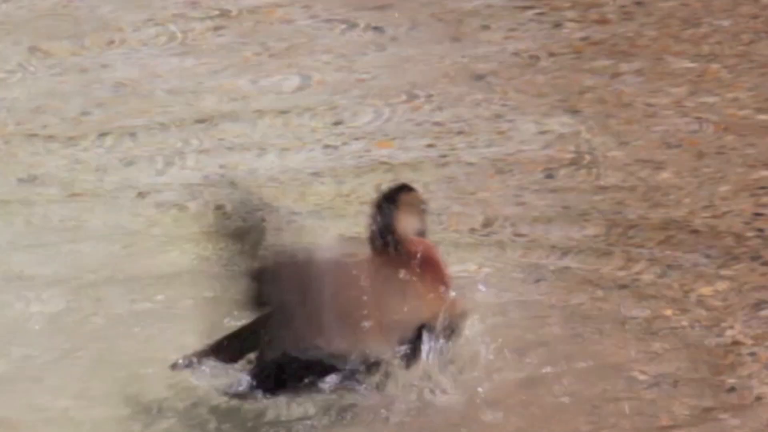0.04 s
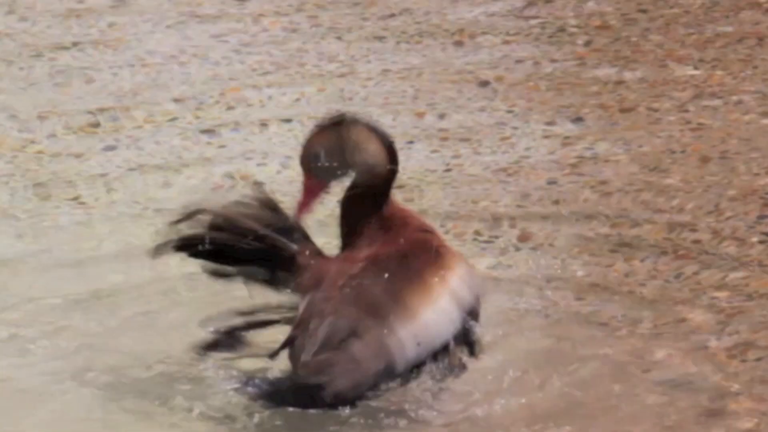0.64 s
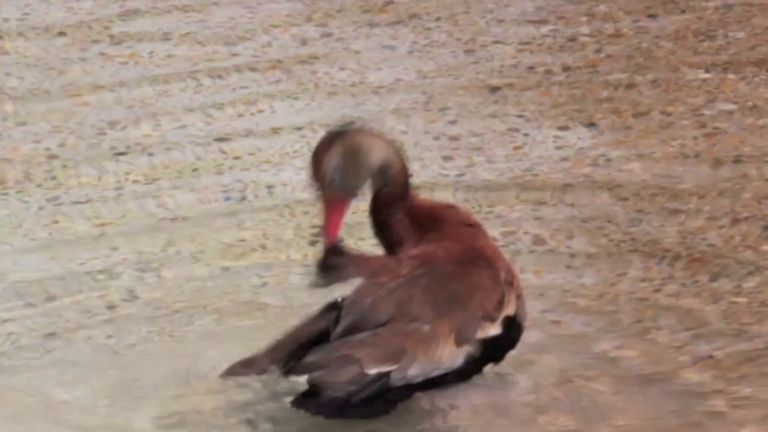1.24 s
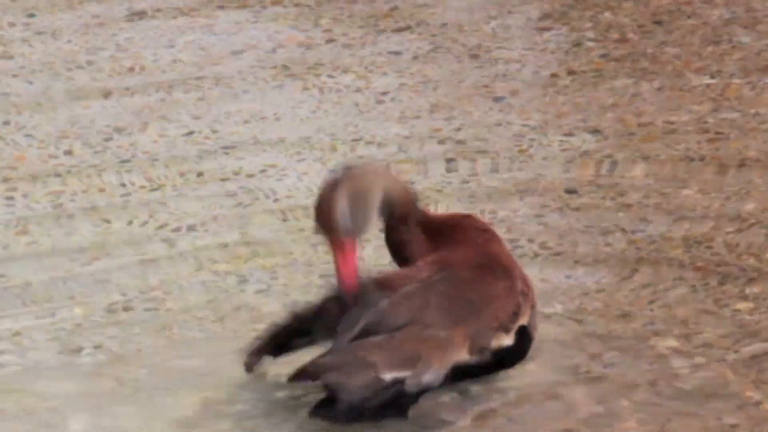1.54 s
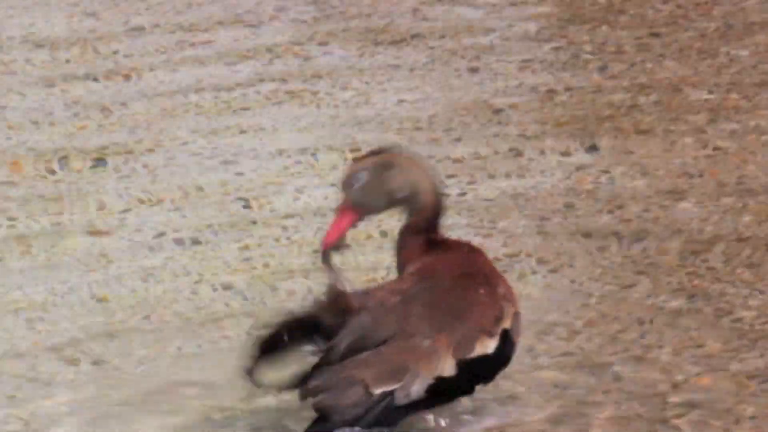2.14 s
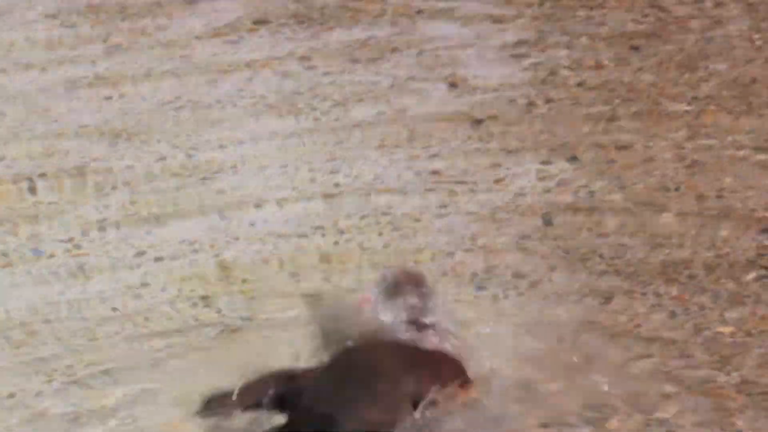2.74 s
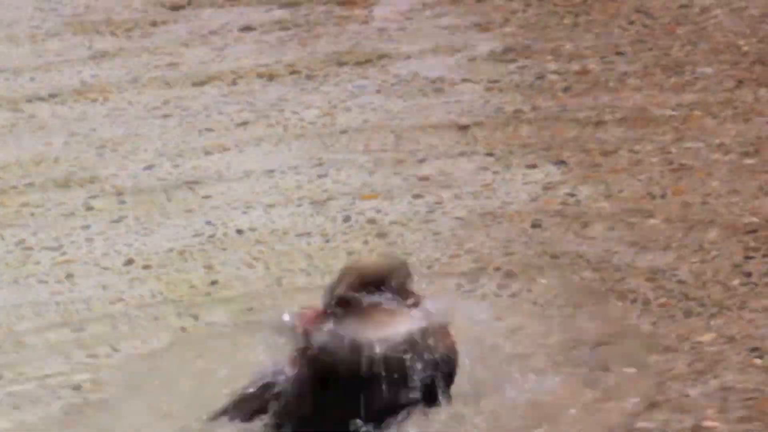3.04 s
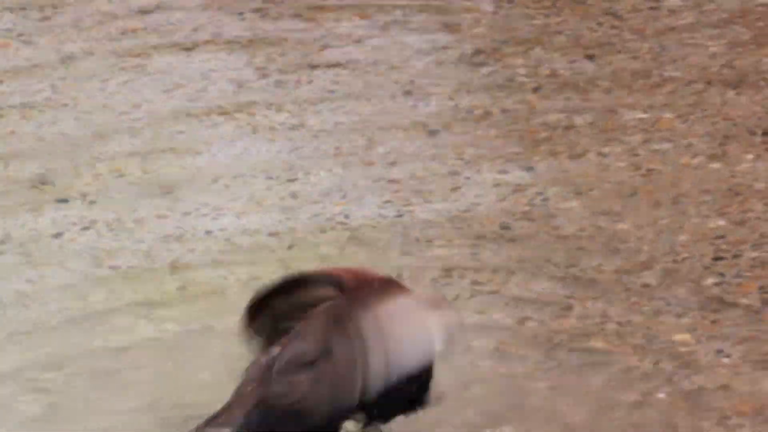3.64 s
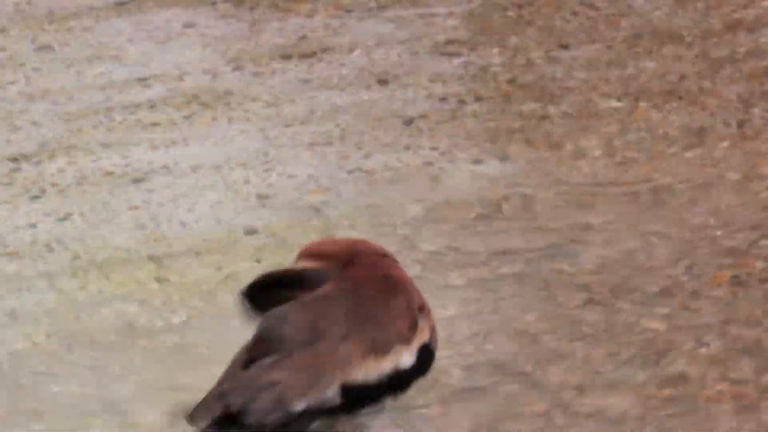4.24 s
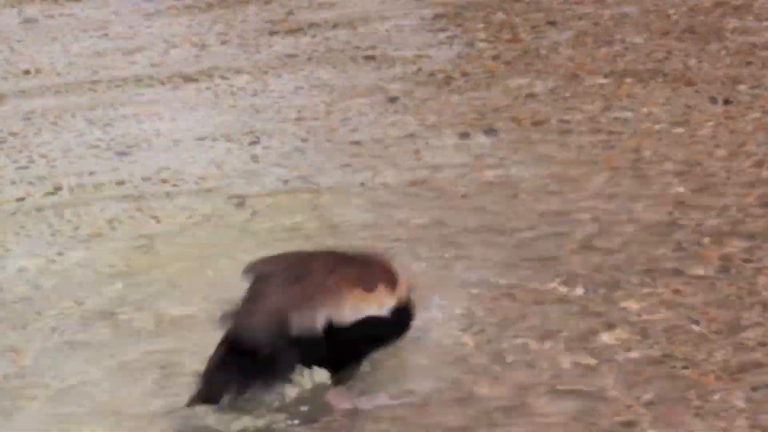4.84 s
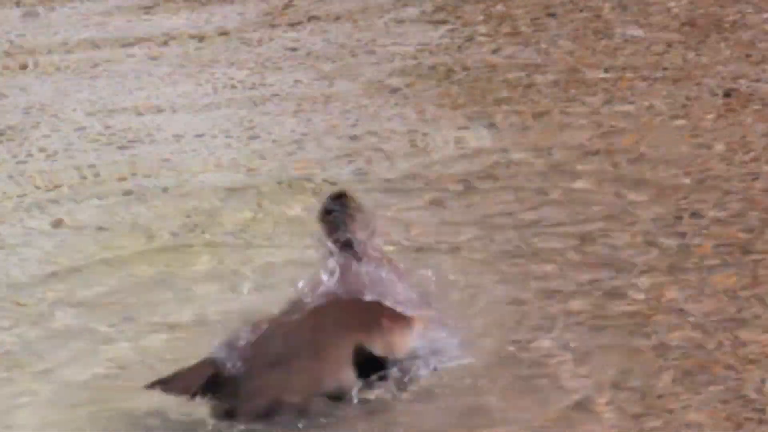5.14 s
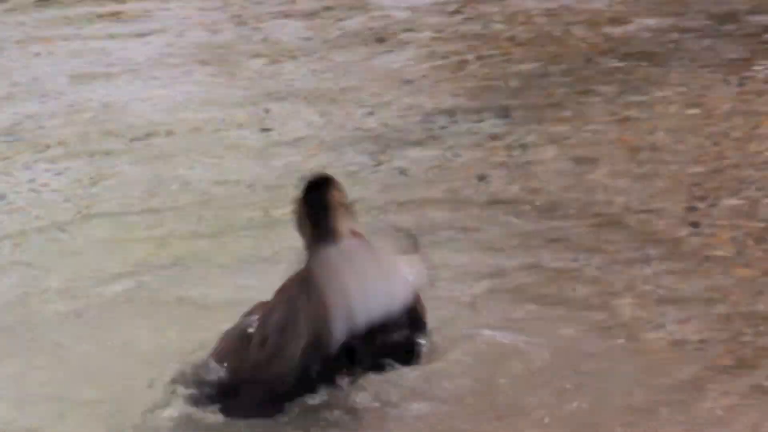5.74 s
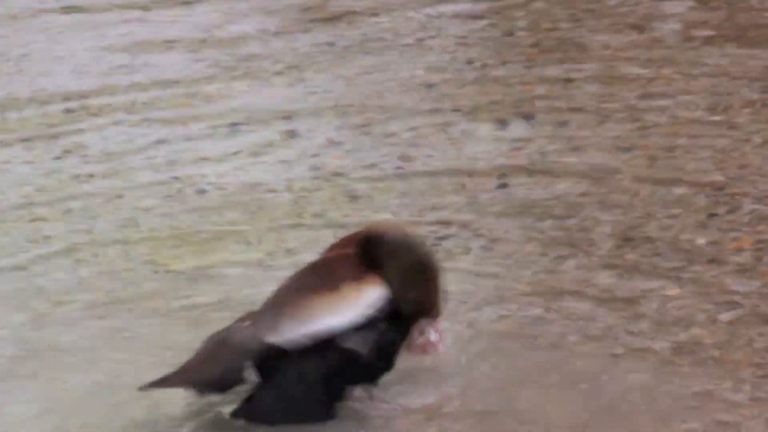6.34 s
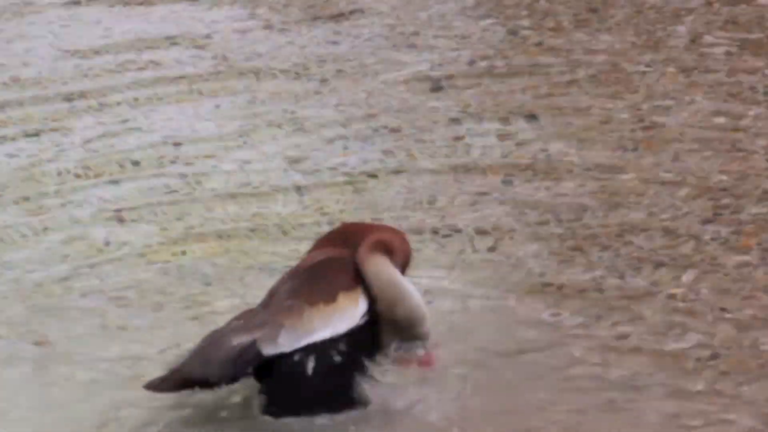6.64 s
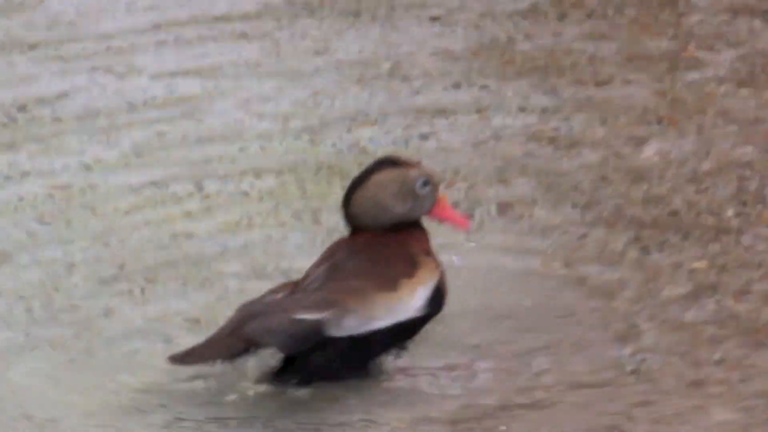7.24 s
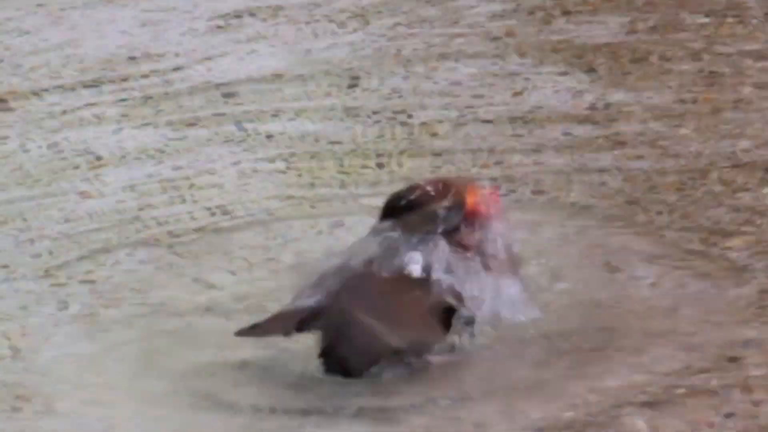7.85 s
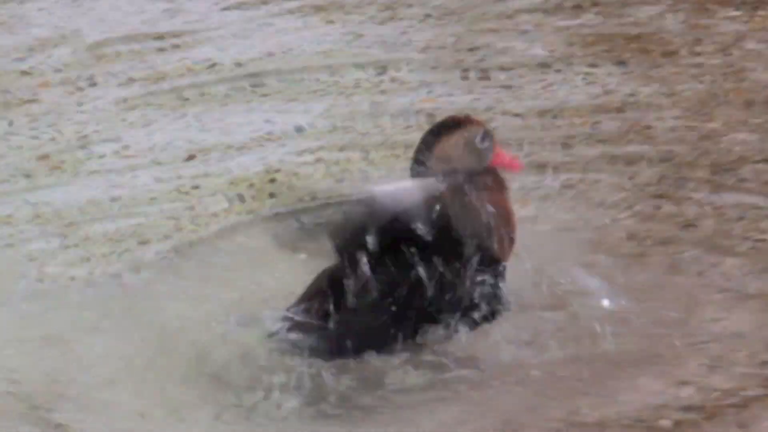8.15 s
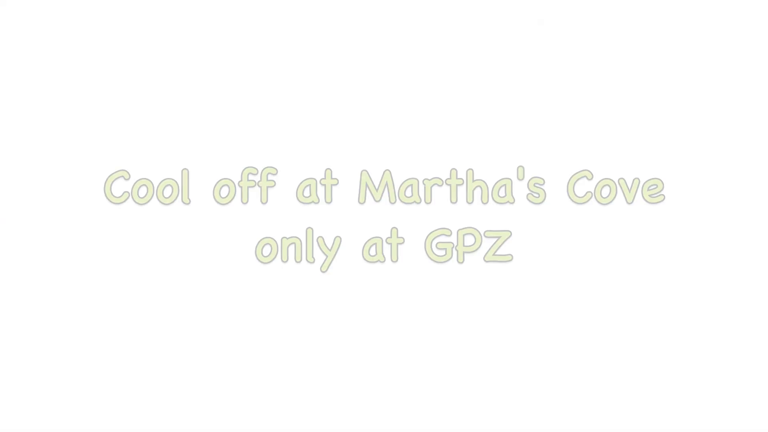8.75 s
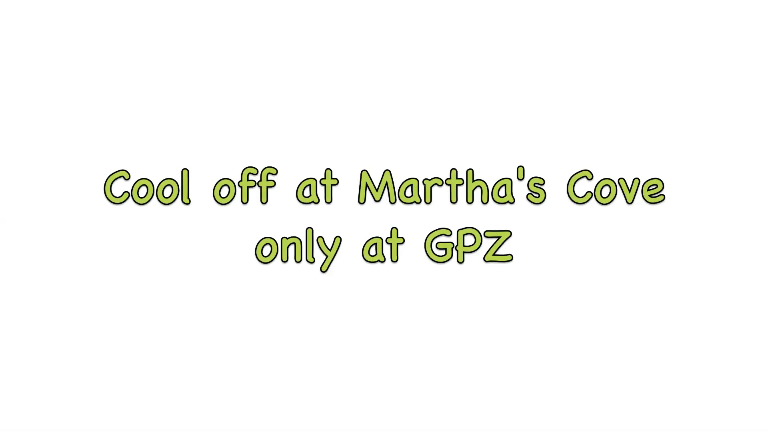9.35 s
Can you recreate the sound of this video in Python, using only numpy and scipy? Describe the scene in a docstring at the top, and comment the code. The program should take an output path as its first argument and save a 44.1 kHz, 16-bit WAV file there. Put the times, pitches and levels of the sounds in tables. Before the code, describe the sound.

Whistling ducks call, peep and splash in a shallow pond, one chattering close by, over steady water and a faint distant engine.

```python
"""Whistling ducks at a shallow pond, mono. From the start: running water, a far engine, faint hums, hiss.
Ducks whistle at once, in thin falling series that echo off the banks. Within the first second a bird
slurs upward, bathing ducks splash, something ticks and other birds peep; one pipes from 1.8 s.
At 3.2 s a duck whistles in two voices. From 4.8 s the hand softly bumps the camera. At 6 s one duck
chatters, loud and close. A last whistle series starts at 7.4 s; all fades to silence by 8.7 s."""
import sys
import numpy as np
from scipy import signal
from scipy.fft import rfft, irfft
from scipy.io import wavfile
from scipy.ndimage import map_coordinates

SR = 44100
rng = np.random.default_rng(int(sys.argv[2]) if len(sys.argv) > 2 else 0)


def wav_out(sig):
    """Save sig, one row per channel (or a flat mono array), as 16-bit PCM at SR to the path in sys.argv[1]."""
    wavfile.write(sys.argv[1], SR, np.round(np.clip(np.atleast_2d(sig).T, -1, 1) * 32767).astype(np.int16))


N = 418950
T = np.arange(N) / SR
CATCH_AT = .48  # where the voice catches, share of note length


def undb(db):
    """Decibels to gain."""
    return 10 ** (np.asarray(db) / 20)


def unit(x):
    """Scale to rms 1."""
    return x / np.sqrt(np.mean(x ** 2))


def add(out, start_s, x):
    """Mix x into out from start_s."""
    i = max(int(start_s * SR), 0)
    out[i:i + len(x)] += x[:N - i]


def band(x, hz, width_hz):
    """One resonance, gain 1 at its centre."""
    return signal.lfilter(*signal.iirpeak(min(hz, .45 * SR), hz / width_hz, SR), x)


def noise(spectrum, size=N):
    """Noise of rms 1, coloured by (freq_hz, gain_db) points."""
    hz, db = np.transpose(spectrum)
    bins_hz = np.fft.rfftfreq(size, 1 / SR) + 1
    gain = undb(np.interp(np.log(bins_hz), np.log(hz), db))
    return unit(irfft(rfft(rng.standard_normal(size)) * gain, size))


def walk(rate_hz, size=N):
    """Smooth random wander, spread near 1."""
    at = np.arange(size) / SR * rate_hz
    return map_coordinates(rng.standard_normal(int(at[-1]) + 2), [at], order=2, mode="nearest")


def turn(hz):
    """Running phase of a moving pitch."""
    return 2 * np.pi * np.cumsum(hz) / SR


def bell(t, centre_s, half_width_s):
    """Gaussian envelope, peak 1."""
    return np.exp(-((t - centre_s) / half_width_s) ** 2)


def bubbles(count, low_hz, high_hz, cycles=7, spread_db=3):
    """Small bubbles, each a short ring rising in pitch."""
    out = np.zeros(N)
    for when, pitch, size in rng.random((count, 3)):
        hz = low_hz * (high_hz / low_hz) ** pitch
        age = np.linspace(0, 1, int(2 * cycles * SR / hz))
        ring = np.sin(turn(hz * (1 + .2 * age))) * np.exp(-2 * np.pi * age)
        add(out, when * T[-1], undb(-spread_db * np.log(max(size, .01))) * ring)
    return unit(out)


def water(wash_db=-36.5, bubble_db=-46):
    """Running water: a steady wash with bubbles in it."""
    # wash spectrum: freq_hz, gain_db
    spectrum = [(15, -48.5), (25, -22), (49, -11.5), (70, -7.5), (90, -0.5), (162, -3.5), (235, -4.5),
                (293, -8), (385, -6.5), (530, -11), (748, -9), (3800, -15), (5640, -17), (7760, -26.5),
                (9000, -31.5), (11700, -52.5), (19800, -120)]
    flow_db = -.06 * walk(3)
    wash = undb(wash_db + .5 * flow_db + .5 * walk(9)) * noise(spectrum)
    return wash + undb(flow_db + bubble_db) * bubbles(count=7000, low_hz=556.6, high_hz=4330)


def engine(flicker_db=2.5):
    """A far engine changes speed; its overtones swell through two low resonances."""
    # engine run: time_s, firing_hz, fundamental_db, overtone_db
    run = [(0, 75.6, -44.5, -52), (.25, 75.2, -42, -52), (.5, 74.5, -68, -43.5), (1.0, 75.9, -44, -55.5),
           (1.27, 75.3, -48, -44.5), (1.42, 84.1, -86, -68.5), (1.58, 113.8, -44, -51.5),
           (2.15, 85.7, -53.5, -57), (2.6, 89.97, -46.5, -52), (3.2, 81, -50, -63), (4.1, 81.1, -51, -64),
           (5.0, 89, -41, -62), (5.35, 81.9, -53, -63), (6.25, 86.48, -40.5, -57), (6.5, 105, -41, -52),
           (6.74, 114, -48, -58), (6.87, 65, -43, -44.5), (7.8, 69.5, -52, -48.5),
           (8.6, 75.4, -40.5, -48.5)]
    # overtone colour: freq_hz, gain_db
    colour = [(125, 0.5), (150, 1), (172, -7.5), (202, 1.5), (222, -8.5), (400, -14.5)]
    times_s, *columns = np.transpose(run)
    firing_hz, fundamental_db, overtone_db = (np.interp(T, times_s, c) for c in columns)
    phase = turn(firing_hz * (1 + .01 * walk(25)))
    overtones = 0
    for k in range(2, 6):
        colour_db = np.interp(k * firing_hz, *np.transpose(colour))
        overtones += undb(colour_db + flicker_db * walk(9)) * np.sin(k * phase)
    fundamental = undb(fundamental_db + .93 * walk(13)) * np.sin(phase)
    return np.sqrt(2) * (fundamental + undb(overtone_db) * overtones)


def hums(edge_s=.17):
    """Two faint low hums in turn, wavering in pitch and level."""
    # hums: start_s, end_s, pitch_hz, level_db
    spans = [(-.1, 1.5, 197, -46), (1.65, 6.9, 236, -49)]
    out = np.zeros(N)
    for start_s, end_s, hz, db in spans:
        swell = np.clip(np.minimum(T - start_s, end_s - T) / edge_s, 0, 1)
        out += swell * undb(db + 2.6 * walk(15)) * np.sin(turn(hz * (1 + .02 * walk(35))))
    return out


def camera_hiss(hiss_db=-46, pulse_hz=70, pulse_depth=.59, whine_hz=15712, whine_db=-59):
    """Fine camera hiss with narrow pulsing peaks and a thin whine."""
    # hiss peaks: centre_hz, width_hz, level_db
    peaks = [(5520, 540, -53.5), (9373, 200, -59.5), (10000, 350, -54.5), (10330, 350, -52),
             (10530, 180, -52), (11650, 200, -65.5), (12087, 160, -59.5), (13100, 130, -59.5),
             (13450, 280, -65), (14300, 400, -60.5)]
    out = undb(hiss_db) * noise([(3000, -31.5), (7000, -3), (9500, 1), (12500, -.5), (15500, -4.5)])
    for hz, width_hz, db in peaks:
        pulse = 1 + pulse_depth * np.sin(2 * np.pi * (pulse_hz * T + rng.random()))
        peak = band(band(rng.standard_normal(N), hz, 1.5 * width_hz), hz, 1.5 * width_hz)
        out += undb(db) * unit(pulse * peak)
    return out + undb(whine_db + 3 * walk(3)) * np.sin(turn(whine_hz + 3 * walk(20)))


def whistle(length_s, from_hz, to_hz, arch=0, catch=0, waver=.007):
    """Phase and envelope of a gliding note; where the voice catches it dips hoarsely and weakens."""
    t = np.arange(int(length_s * SR)) / SR
    dip = catch * bell(t, CATCH_AT * length_s, half_width_s=.009)
    glide_hz = (from_hz + (to_hz - from_hz) * t / length_s) * (1 + arch * np.sin(np.pi * t / length_s))
    jitter = waver * walk(260, len(t)) + .74 * dip * walk(1500, len(t))
    phase = turn(glide_hz * (1 - dip) * (1 + jitter))
    swell = np.sin(np.pi / 2 * np.clip(np.minimum(t, length_s - t) / .016, 0, 1))  # 16 ms edges
    flutter_db = 2 * walk(110, len(t))
    catch_db = -8 * np.tanh(dip / .03)
    return phase, np.sqrt(2) * swell * undb(flutter_db + catch_db)


def ducks(third_db=1, close_db=-34, distance_share=.4, hoarse_db=15):
    """Evenly paced, nearly pure whistles that sink in pitch, with faint harmonics 2 and 3 and echoes."""
    # series, one duck each: first_s, last_s, notes, length_s, first_hz, last_hz, settle_power (1 = even),
    # fall, arch, catch, waver (these four: share of pitch, within a note),
    # first_db, middle_db, last_db, overtone_db
    series = [ (.082, 0.741, 4, .13, 4137, 3980, 3.5, .014, -0.0088, 0, 0.0041, -42.5, -34.5, -39, -61.5),
              (1.912, 2.91, 7, 0.11, 3650, 3578, 3.5, -.003, -.008, .1, 0.0074, -38.5, -40, -41.5, -63.5),
              (3.168, 3.557, 3, 0.081, 5160, 5004, .3, -0.0047, 0.009, 0.0081, 0.0067, -38.5, -36, -40.5, -68),
              (5.423, 5.888, 3, .098, 4770, 4700, 3, .014, -.015, 0.011, 0.0035, -41.5, -39.5, -43, -67.5),
              (7.404, 8.526, 6, .142, 4169, 3875, 3, 0.028, 0.0043, .026, 0.0052, -33.5, -36, -41.5, -52.5)]
    direct, scattered = np.zeros(N), np.zeros(N)
    for (first_s, last_s, notes, length_s, first_hz, last_hz, settle_power,
         fall, arch, catch, waver, *levels_db, overtone_db) in series:
        for along in np.linspace(0, 1, round(notes)):
            start_s = first_s + (last_s - first_s) * along
            hz = last_hz + (first_hz - last_hz) * (1 - along) ** settle_power
            db = np.interp(along, [0, .5, 1], levels_db)
            phase, swell = whistle(length_s, hz * (1 + fall / 2), hz * (1 - fall / 2), arch, catch, waver)
            overtones = np.sin(2 * phase) + undb(third_db) * np.sin(3 * phase)
            note = swell * (undb(db) * np.sin(phase) + undb(overtone_db) * overtones)
            note += catch * undb(db + hoarse_db) * catch_rasp(length_s, hz)
            add(direct, start_s, note)
            # fainter notes are further off: more arrives as echo
            add(scattered, start_s, note * undb(distance_share * (close_db - db)))
    return direct + banks(scattered, near_db=-3.5, far_db=-7)


def banks(x, near_db, far_db, near_t60_s=.24, far_t60_s=.85, echoes_per_s=900):
    """Quick echoes off the near banks, then a fainter tail from further off."""
    out, t = 0, np.arange(SR) / SR
    for db, t60_s, delay_s in ((near_db, near_t60_s, .008), (far_db, far_t60_s, .04)):
        echoes = rng.standard_normal(SR) * (rng.random(SR) < echoes_per_s / SR)
        echoes *= (t > delay_s) * np.exp(-np.log(1000) * t / t60_s)
        out += undb(db) * signal.fftconvolve(x, echoes / np.linalg.norm(echoes))[:N]
    return out


def slur(from_s=.32, from_hz=1195, top_hz=3030, octaves_per_s=3.25, waver=.007):
    """A bird's long rising note: the fundamental swells twice, the octave once between."""
    # partial swells: harmonic, centre_s, half_width_s, level_db
    swells = [(1, .375, .032, -42), (1, .675, .12, -42), (2, .57, .16, -48.5)]
    octaves = np.clip(octaves_per_s * (T - from_s), -1, np.log2(top_hz / from_hz))
    phase = turn(from_hz * 2 ** octaves * (1 + waver * walk(300)))
    return np.sqrt(2) * sum(undb(db) * bell(T, centre_s, half_width_s) * np.sin(round(k) * phase)
                            for k, centre_s, half_width_s, db in swells)


def splashes():
    """Bathing ducks throw up sprays of drops."""
    # sprays: start_s, length_s, centre_hz, level_db
    sprays = [(0.328, 0.14, 1500, -50), (2.045, 0.16, 1500, -43), (2.55, 0.16, 2300, -54),
              (3.99, 0.055, 1700, -44), (4.03, .055, 2500, -35.5), (7.321, 0.29, 2160, -41)]
    drops = bubbles(count=6000, low_hz=900, high_hz=5940, cycles=2.6)
    patter = banks(drops, near_db=3.5, far_db=-17)
    out = np.zeros(N)
    for start_s, length_s, hz, db in sprays:
        swell = np.sin(np.pi * np.clip((T - start_s) / length_s, 0, 1))
        out += undb(db) * swell * unit(band(patter, hz, hz / 2))
    return out


def ticks(decay_s=.003, scatter_db=.5):
    """Quick runs of dry snaps, each ringing three broad resonances."""
    # tick runs: start_s, gap_s, count, peak_db
    runs = [(.765, .026, 3, -22.5), (.894, 0.027, 3, -26.5), (1.428, .0405, 3, -24),
            (2.596, 0.027, 2, -25.5)]
    # resonances: centre_hz, width_hz, gain_db
    modes = [(1900, 350, -3), (2333, 510, 2), (4000, 1000, 0.5)]
    out, t = np.zeros(N), np.arange(SR // 20) / SR
    for start_s, gap_s, count, peak_db in runs:
        for k in range(round(count)):
            snap = rng.standard_normal(len(t)) * np.exp(-t / decay_s)
            ring = sum(undb(db) * band(band(snap, hz, width_hz), hz, width_hz)
                       for hz, width_hz, db in modes)
            gain = undb(peak_db + scatter_db * rng.standard_normal())
            add(out, start_s + k * gap_s, gain * ring / np.abs(ring).max())
    return out


def peeps(piping_s=1.846, piping_gap_s=.18):
    """Short peeps and piping around the pond, and a lower second voice under one duck's three whistles."""
    # notes: start_s, length_s, from_hz, to_hz, level_db
    # rows at 3.17, 3.391 and 3.566 s: second voice of that duck's syrinx
    short_notes = [(0.867, 0.081, 4166, 4335, -43.5), (0.933, 0.076, 4390, 4120, -40.5),
                   (1.066, .095, 3980, 3856, -38.5), (1.177, 0.051, 4620, 4400, -42.5),
                   (1.187, 0.13, 3940, 3810, -47.5), (1.478, .07, 4120, 3780, -41.5),
                   (2.07, 0.103, 1158, 1263, -44.5), (2.115, 0.046, 5240, 5050, -46),
                   (2.661, .05, 4380, 4286, -41), (3.17, .064, 4110, 3900, -45.5),
                   (3.391, 0.039, 4350, 4350, -43.5), (3.566, 0.076, 4420, 4360, -46),
                   (3.62, 0.06, 4950, 4654, -44), (4.895, .04, 4650, 4220, -46.5),
                   (6.601, 0.214, 4720, 4590, -48), (7.369, 0.044, 3200, 3410, -39),
                   (7.44, 0.058, 6775, 6790, -44.5)]
    piping = [(piping_s + k * piping_gap_s, .034, 4650, 4400, -45) for k in range(4)]
    out = np.zeros(N)
    for start_s, length_s, from_hz, to_hz, db in short_notes + piping:
        phase, swell = whistle(length_s, from_hz, to_hz)
        add(out, start_s, undb(db) * swell * np.sin(phase))
    return out


def catch_rasp(length_s, pitch_hz):
    """A hoarse puff under the pitch, where a duck's voice catches."""
    t = np.arange(int(length_s * SR)) / SR
    centre_hz, width_hz = .82 * pitch_hz, .2 * pitch_hz
    puff = band(band(rng.standard_normal(len(t)), centre_hz, width_hz), centre_hz, 2 * width_hz)
    return unit(puff) * bell(t, CATCH_AT * length_s, half_width_s=.026)


def camera_bumps(decay_s=.0048):
    """Dull thuds of the hand on the camera body."""
    # bumps: start_s, peak_db, pitch_hz
    bumps = [(4.837, -22, 140), (5.082, -24, 125.2), (5.294, -26, 100), (6.228, -24.5, 148),
             (6.259, -24.5, 218.5), (6.684, -25, 149.7), (7.35, -22, 141), (7.419, -21.5, 121),
             (7.476, -24, 150), (7.548, -19.5, 110), (7.582, -26.5, 120), (7.66, -29.5, 114.9),
             (8.232, -28, 130)]
    out, t = np.zeros(N), np.arange(SR // 10) / SR
    for start_s, peak_db, hz in bumps:
        spectrum = [(hz / 4, -18), (hz, 0), (2 * hz, -8), (4 * hz, -32), (20 * hz, -80)]
        thud = noise(spectrum, len(t)) * t * np.exp(-t / decay_s)
        add(out, start_s, undb(peak_db) * thud / np.abs(thud).max())
    return out


def chatter(hold_db=-11, rasp_db=-14, squeak_db=-22, overtone_db=-23.5):
    """A close duck: each syllable swells to a sharp accent, then breaks into a rasp under its pitch."""
    # syllables: accent_s, pitch_hz, level_db, half_width_s, squeak_hz
    syllables = [(6.063, 4600, -21.5, .0085, 8120), (6.156, 4555, -22.5, 0.0074, 8160),
                 (6.255, 4560, -20.5, 0.0037, 7400), (6.351, 4670, -22, 0.0036, 7350),
                 (6.447, 4614, -24, 0.02, 7300)]
    # rasp spectrum: freq_hz, gain_db
    spectrum = [(1500, -46.5), (2900, -15), (3700, -10), (4450, -4), (4900, -18.5), (6500, -22.5),
                (9200, -23), (11500, -26), (14000, -24.5), (16000, -40)]
    out = np.zeros(N)
    t = np.arange(-SR // 20, SR // 10) / SR  # 0 at the accent
    for accent_s, hz, db, half_width_s, squeak_hz in syllables:
        phase = turn(hz * (1 - .39 * t) * (1 + .0095 * walk(400, len(t))))
        accent = bell(t, 0, half_width_s)
        hold = undb(hold_db) * bell(t, .012, .047)
        tone = np.sin(phase) + undb(overtone_db) * (np.sin(2 * phase) + np.sin(3 * phase))
        # the other side of the syrinx squeaks higher, just before the accent
        squeak = undb(squeak_db) * bell(t, -.004, .0094) * np.sin(squeak_hz / hz * phase)
        voice = np.sqrt(2) * (np.maximum(accent, hold) * tone + squeak)
        rasp = undb(rasp_db) * bell(t, .012, .035) * noise(spectrum, len(t))
        add(out, accent_s + t[0], undb(db) * (voice + rasp))
    return out


def scene():
    """All sources and bank echoes at one microphone; both channels alike."""
    close, far, clicks = chatter(), slur() + peeps(), ticks()
    echoes = banks(far, near_db=-4, far_db=-12.5) + banks(clicks, near_db=-9, far_db=-19)
    echoes += banks(close, near_db=-6, far_db=-12)
    mono = ducks() + close + far + clicks + echoes
    mono += water() + splashes() + engine() + hums() + camera_hiss() + camera_bumps()
    return np.array([mono, mono])


def record(dry, fade_start_s=7.812, fade_end_s=8.701, top_hz=15800):
    """Linear fade to silence, then a steep low-pass."""
    fade = np.clip((fade_end_s - T) / (fade_end_s - fade_start_s), 0, 1)
    return signal.sosfilt(signal.ellip(12, .2, 80, top_hz, fs=SR, output="sos"), dry * fade)


dry = scene()
out = record(dry)
wav_out(out)
```